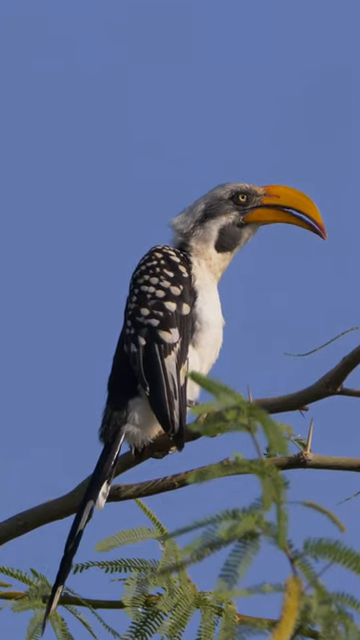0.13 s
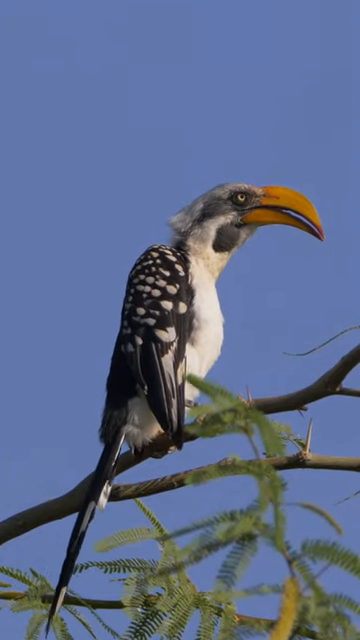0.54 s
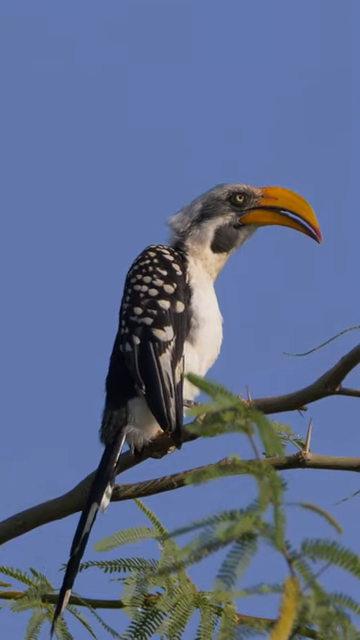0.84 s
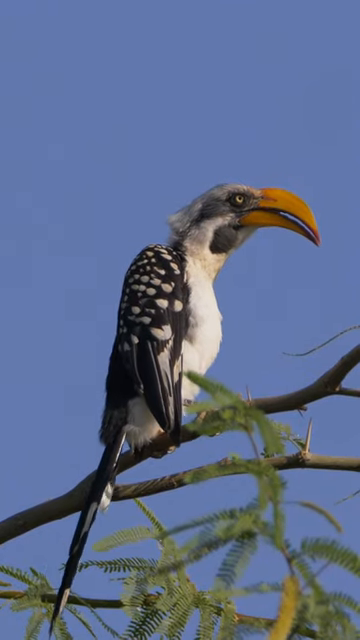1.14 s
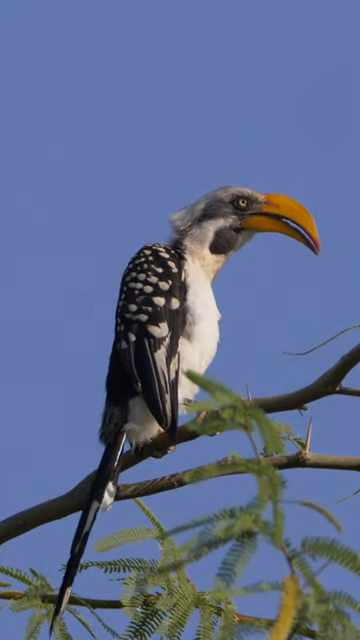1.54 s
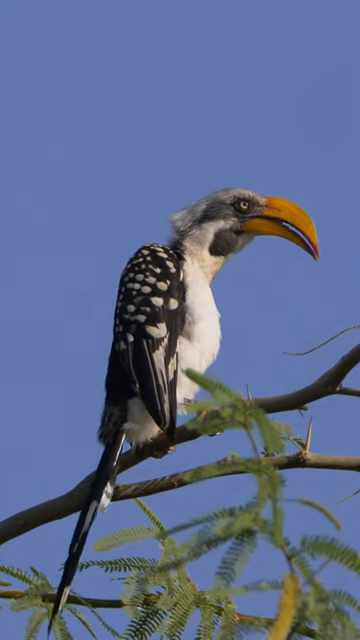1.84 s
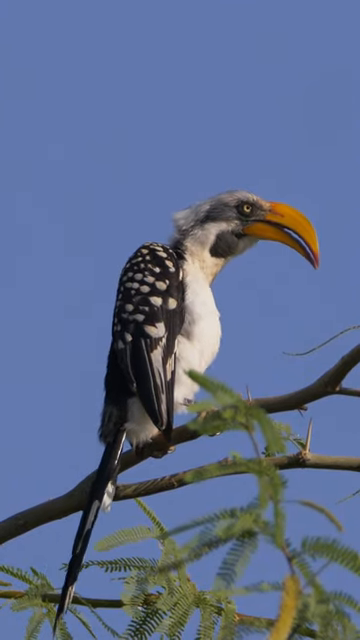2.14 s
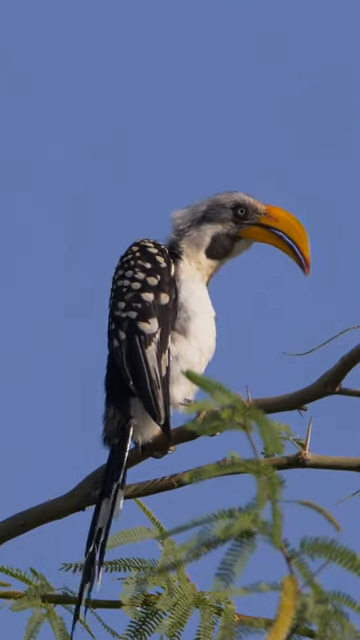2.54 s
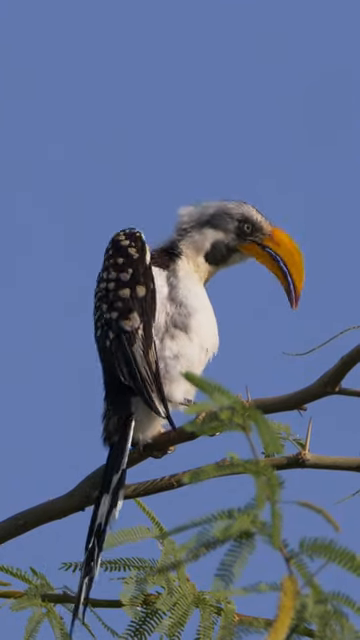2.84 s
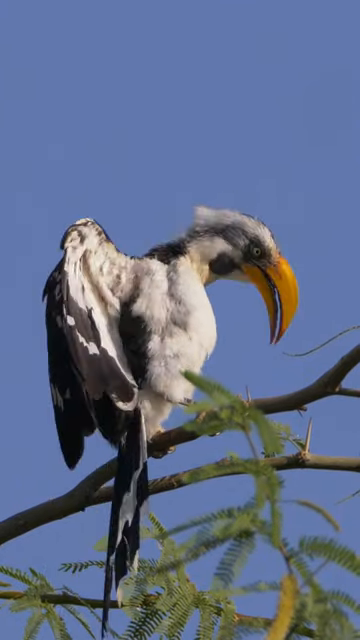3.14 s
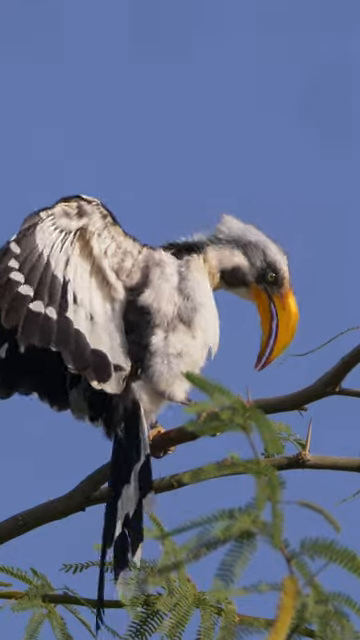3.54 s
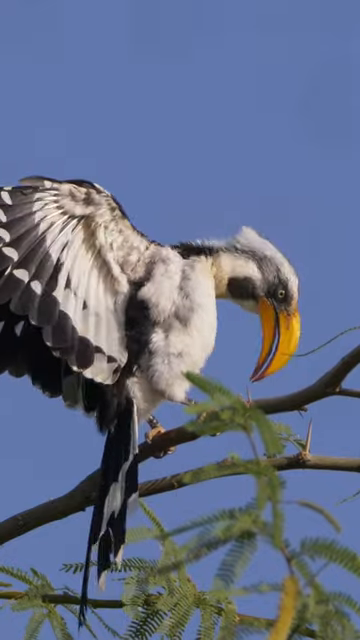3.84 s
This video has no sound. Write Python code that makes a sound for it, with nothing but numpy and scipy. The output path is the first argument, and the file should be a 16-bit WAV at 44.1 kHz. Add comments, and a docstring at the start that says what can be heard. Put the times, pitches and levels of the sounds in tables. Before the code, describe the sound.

A hornbill gives hoarse, hollow clucks about six a second, close and central; a lower, clearer mate fades in and the pair grow louder and higher, over faint songbird chirps outdoors.

```python
"""A hornbill clucks from a tree top, bright and hoarse; its lower, clearer mate joins in and both grow excited.
Each cluck is a stack of overtones with an arching pitch, shaped by the bird's throat.
Below lie a low outdoor rumble and a soft hiss, both made of filtered noise.
Small songbirds whistle and chirp further off as gliding sines, smeared by echoes from the bush."""
import sys
import numpy as np
from scipy import signal
from scipy.fft import rfft, irfft
from scipy.io import wavfile
from scipy.ndimage import uniform_filter1d

SR = 44100
rng = np.random.default_rng(int(sys.argv[2]) if len(sys.argv) > 2 else 0)


def inscribe(sig):
    """Save sig as 16-bit PCM at rate SR to the path in sys.argv[1].

    A 1-D sig is mono; a 2-D sig holds one channel per row.
    Samples are clipped to [-1, 1] before scaling.
    """
    pcm = np.round(np.clip(np.atleast_2d(sig).T, -1, 1) * 32767)
    wavfile.write(sys.argv[1], SR, pcm.astype(np.int16))


def gain_from_db(level_db):
    """Convert decibel levels to linear amplitude factors (20 dB per decade)."""
    decades = np.asarray(level_db, float) / 20
    return 10 ** decades


N = 176400  # samples: 4 s
FLUTTER_DB = 3.0  # far notes waver in level on their way through the leaves


def at_hz(points, hz):
    """Read a table of frequencies and levels, evenly in pitch between its rows."""
    table_hz, table_db = np.transpose(points)
    return np.interp(np.log(np.maximum(hz, 1)), np.log(table_hz), table_db)


def colour(x, points):
    """Filter a sound: make each frequency louder or softer by a table in dB."""
    gain = gain_from_db(at_hz(points, np.fft.rfftfreq(len(x), 1 / SR)))
    return irfft(rfft(x) * gain, len(x))


def rms_one(x):
    """Scale a sound to an average (rms) level of one."""
    return x / np.sqrt(np.mean(x ** 2))


def add(track, s, sound):
    """Mix a sound into the track at s seconds, cutting off what falls outside."""
    i = int(round(s * SR))
    a, b = max(i, 0), min(i + len(sound), N)
    track[a:b] += sound[a - i:b - i]


def tone(hz, gain):
    """A sine that follows a pitch and a level (rms), with soft 2.9 ms ends."""
    edge = np.minimum(np.arange(len(hz)), np.arange(len(hz))[::-1]) / (0.0029 * SR)
    phase = 2 * np.pi * np.cumsum(hz) / SR
    return np.sqrt(2) * gain * np.minimum(edge, 1) * np.sin(phase)


def gusts(depth_db, per_s):
    """A gain that wanders between random levels, per_s of them each second."""
    steps = rng.standard_normal(N // 100)
    return gain_from_db(depth_db * np.interp(np.arange(N) / SR * per_s, np.arange(len(steps)), steps))


# How excitement grows: (time [s], bright cluck length [s], bright top pitch [Hz], mate's top pitch [Hz])
EXCITEMENT_OVER_TIME = [(0, 0.057, 271, 211), (2.577, 0.057, 304.5, 214.2), (3.418, 0.077, 332.9, 234.9)]


def excitement(s):
    """Growing effort: bright cluck length, bright top pitch and mate's top pitch at s seconds."""
    t, *columns = np.transpose(EXCITEMENT_OVER_TIME)
    return [np.interp(s, t, column) for column in columns]


PEAK_AT, SWELL = 0.3704, 1.095  # where in a cluck the effort peaks (0-1); how pointed the swell is
RISE, FALL = .27, .17  # share of the top pitch by which a cluck starts and ends lower
JITTER = 0.11  # scatter of pulse timing at roughness 1 [cycles]
OPENING_DB = 3  # the bill opens: gain per overtone number (up to 7) from start to end of a cluck


def clucks(rows, throat):
    """Syrinx (voice organ) overtones arch in pitch with effort, waver hoarsely and pass the throat."""
    out = np.zeros(N)
    chance = rng.standard_normal((len(rows), 15, 3, 64))
    knots = np.arange(64)  # one random value per cycle of the voice
    for (s, length, db, top_hz, rough), draws in zip(rows, chance):
        u = np.arange(int(length * SR)) / (length * SR)  # 0 to 1 through the cluck
        effort = np.interp(u, [0, PEAK_AT, 1], [0, .5, 1])  # 0.5 at the peak
        drop = np.where(effort < .5, RISE, FALL) * (2 * effort - 1) ** 2
        cycles = np.cumsum(top_hz * (1 - drop)) / SR
        cycles = cycles + JITTER * rough * np.interp(cycles, knots, draws[0, 0])
        hoarse = rough * (1 + 2 * u ** 3)  # each cluck grows hoarser towards its end
        voice = 0
        for k in range(1, 15):
            size = hoarse * np.interp(cycles, knots, draws[k, 0])
            shift = hoarse * np.interp(cycles, knots, draws[k, 1])
            opening = gain_from_db(OPENING_DB * min(k, 7) * (u - 1.0))
            phase = 2 * np.pi * k * cycles + shift * k / 4 + draws[k, 2, 0]
            voice = voice + opening * (1 + size) * np.cos(phase)
        swell = np.sin(np.pi * effort) ** SWELL
        add(out, s, gain_from_db(db) * rms_one(colour(voice, throat)) * swell)
    return out


# Clucks of the bright bird, level before the swell: (time [s], level [dB])
BRIGHT_CLUCKS = [(-.04, -24.5), (.114, -19.5), (0.281, -18), (.444, -20.5), (0.608, -21), (.769, -19),
                 (.928, -18.5), (1.094, -18.5), (1.252, -19), (1.417, -18.5), (1.573, -15.5),
                 (1.738, -16.5), (1.902, -17), (2.063, -17), (2.219, -16.5), (2.386, -17.5), (2.553, -15),
                 (2.715, -15.5), (2.891, -16), (3.062, -14.5), (3.242, -15.5), (3.418, -17), (3.61, -15),
                 (3.79, -15), (3.978, -16)]
# Colour of its throat: (frequency [Hz], level [dB])
BRIGHT_THROAT_COLOUR = [(300, -36), (450, -20), (600, -8.5), (850, 0), (990, -5.5), (1150, 4.5), (1400, -4),
                        (1650, -15.5), (1950, -34), (2700, -27), (4000, -53)]


def bright_hornbill():
    """The bright bird's clucks lengthen, rise in pitch and clear from hoarse to smoother."""
    rows = []
    for s, db in BRIGHT_CLUCKS:
        length, top_hz, _ = excitement(s)
        first_s, last_s = EXCITEMENT_OVER_TIME[0][0], EXCITEMENT_OVER_TIME[2][0]
        rough = np.interp(s, [first_s, last_s], [.7, .24])
        rows.append((s, length, db, top_hz, rough))
    return clucks(rows, BRIGHT_THROAT_COLOUR)


# Clucks of the low mate, level before the swell: (time [s], length [s], level [dB])
MATE_CLUCKS = [(0.072, .035, -36.5), (0.389, 0.027, -43), (0.722, 0.037, -39.5), (0.996, 0.032, -35.5),
               (1.204, 0.026, -32), (1.385, 0.049, -28.5), (1.574, 0.037, -27.5), (1.753, 0.054, -27.5),
               (1.939, 0.059, -25), (2.138, 0.048, -24), (2.323, 0.066, -21), (2.521, 0.043, -18),
               (2.72, 0.0617, -15.5), (2.927, 0.069, -18), (3.132, 0.088, -19), (3.357, 0.072, -19),
               (3.583, 0.09, -17), (3.807, 0.11, -19.5)]
# Colour of its throat: (frequency [Hz], level [dB])
MATE_THROAT_COLOUR = [(250, -31), (430, -15), (660, 5.5), (880, 9.5), (1150, -14.5), (1400, -11),
                      (1750, -12.5), (2400, -51)]
TICK_HZ, TICK_S, TICK_DB = 1733, 0.015, -21  # tick level is against the cluck


def low_hornbill():
    """The mate's clear clucks rise in pitch, each starting with a short high tick."""
    rough = .17
    rows = [(s, length, db, excitement(s)[2], rough) for s, length, db in MATE_CLUCKS]
    out = clucks(rows, MATE_THROAT_COLOUR)
    tick = np.hanning(int(TICK_S * SR))
    for s, _, db in MATE_CLUCKS:
        add(out, s, tone(np.full(len(tick), TICK_HZ), gain_from_db(db + TICK_DB) * tick))
    return out


def echoes(x, t60, build_s):
    """Scatter from leaves and branches: a lumpy tail of unit energy, dying by 60 dB in t60 seconds."""
    t = np.arange(SR // 2) / SR
    tail = rng.standard_normal(len(t)) * gain_from_db(-60 * t / t60)
    tail = tail * (1 - np.exp(-t / build_s)) * gusts(FLUTTER_DB, per_s=60.9)[:len(t)]
    return signal.fftconvolve(x, tail / np.sqrt(np.sum(tail ** 2)))[:N]


# Low rumble before gusting; it swells again as the wings spread: (time [s], level [dB])
RUMBLE_LEVEL = [(0, -49), (1.9, -60), (2.6, -63.5), (3.099, -55.5), (3.5, -59.5)]


def rumble():
    """Lumpy low noise between 50 and 270 Hz, gusting."""
    s, db = np.transpose(RUMBLE_LEVEL)
    band = signal.butter(3, [50, 270], "band", fs=SR, output="sos")
    noise = rms_one(signal.sosfilt(band, rng.standard_normal(N)))
    level = gain_from_db(np.interp(np.arange(N) / SR, s, db))
    return noise * level * gusts(4.5, per_s=14)


# Colour of the hiss, only its shape counts: (frequency [Hz], relative level [dB per Hz])
HISS_COLOUR = [(40, -30), (330, -27.5), (1200, -31.5), (2800, -25.5), (6000, -31), (15700, -35.5)]
# Colour of the side (left-right difference) against the middle: (frequency [Hz], level [dB])
HISS_SIDE_COLOUR = [(25, -36.5), (300, -2), (2500, -5.5), (6000, -1.5)]


def hiss():
    """Steady coloured noise for the middle and, coloured once more, for the side."""
    mid, side = [colour(row, HISS_COLOUR) for row in rng.standard_normal((2, N))]
    gain = gain_from_db(-58) / np.std(mid)
    return gain * mid, gain * colour(side, HISS_SIDE_COLOUR)


CHORUS_PER_S, CHORUS_DB = 50, -64  # notes per second; level of the softest notes
CHORUS_LOW_HZ, CHORUS_HIGH_HZ = 2300, 3997  # range of starting pitches


def chorus():
    """Many small birds far off, twittering at random in short falling notes."""
    out = np.zeros(N)
    u = np.linspace(0, 1, SR // 40)  # each note lasts 25 ms
    for when, start, glide, size in rng.random((int(CHORUS_PER_S * N / SR), 4)):
        start_hz = CHORUS_LOW_HZ + (CHORUS_HIGH_HZ - CHORUS_LOW_HZ) * start ** 2
        hz = start_hz * (1 - 0.406 * glide * u)
        add(out, when * N / SR, tone(hz, gain_from_db(CHORUS_DB + 16.3 * size) * np.sin(np.pi * u)))
    return out


# Longer whistles, a list of points for each: (time [s], pitch [Hz], level [dB])
WHISTLE_CONTOURS = [
    [(.315, 4655, -58), (.4, 3790, -42.5)],
    [(.765, 2450, -53), (.93, 2390, -55)],
    [(1.195, 2142, -69), (1.227, 2736, -41.5), (1.238, 6740, -52.5), (1.252, 7210, -48),
     (1.278, 4950, -48.5)],
    [(2.32, 2550, -49.5), (2.5, 2210, -66)],
    [(2.35, 4250, -46.5), (2.41, 3800, -38.5), (2.49, 2886, -42.5)],
    [(2.615, 2800, -44.5), (2.655, 3710, -28), (2.69, 3907, -39.5), (2.74, 4030, -34.5)],
    [(2.74, 3810, -27), (2.76, 3086, -32), (2.8, 2733, -43), (2.855, 3293, -38)],
    [(2.7, 2400, -56.5), (2.96, 2090, -59.5)],
    [(3.387, 5200, -40), (3.455, 2900, -37)],
]
# One reedy arched call, by its unheard base pitch: (time [s], pitch [Hz], level [dB])
ARCHED_CALL = [(.99, 1060, -60), (1.028, 1780, -50), (1.08, 1150, -64)]


def whistlers():
    """Sines follow drawn contours; the arched call sounds at two and three times its base pitch."""
    out = np.zeros(N)
    for rows, multiple in [(rows, 1) for rows in WHISTLE_CONTOURS] + [(ARCHED_CALL, 2), (ARCHED_CALL, 3)]:
        s, hz, db = np.transpose(rows)
        t = np.arange(s[0], s[-1], 1 / SR)
        smooth_hz = uniform_filter1d(np.interp(t, s, hz), size=400)  # rounds the corners of the glide
        add(out, s[0], tone(multiple * smooth_hz, gain_from_db(np.interp(t, s, db))))
    return out


# Quick chirps, level at the loudest point: (time [s], length [s], from [Hz], to [Hz], level [dB])
CHIRP_SWEEPS = [(0.479, 0.0076, 5400, 2590, -38), (0.512, 0.029, 5780, 7210, -45),
                (0.537, 0.02, 5460, 2570, -36), (0.543, 0.058, 7600, 2640, -38.5),
                (1.206, .024, 4300, 5250, -49), (1.284, 0.053, 7100, 4200, -45.5),
                (1.357, 0.022, 3910, 2590, -42.5), (1.421, 0.026, 3050, 3700, -51),
                (1.547, 0.075, 3260, 1950, -40), (1.724, 0.019, 3060, 5180, -61),
                (1.781, 0.021, 5620, 2350, -37), (1.873, .024, 5910, 2800, -39.5),
                (2.046, 0.019, 3710, 2960, -43.5), (2.504, 0.055, 3103, 1660, -45.5),
                (2.528, 0.041, 4100, 2800, -33.5), (2.876, 0.041, 6070, 4240, -36),
                (3.141, 0.0306, 5450, 4340, -48.5), (3.368, 0.033, 5510, 2845, -30),
                (3.397, .032, 4800, 3350, -35)]


def chirpers():
    """Sines sweep from one pitch to another, fast at first and then flattening."""
    out = np.zeros(N)
    for s, length, from_hz, to_hz, db in CHIRP_SWEEPS:
        u = np.arange(int(length * SR)) / (length * SR)
        hz = to_hz + (from_hz - to_hz) * (1 - u) ** 2.4
        add(out, s, tone(hz, gain_from_db(db) * np.sin(np.pi * u ** 0.92)))
    return out


FAR_T60_S, FAR_BUILD_S = 0.53, 0.0044  # how long the far echo takes to die by 60 dB; how fast it builds up


def scene():
    """Birds in the centre, echoes and hiss wider; the far chorus arrives only as echo."""
    pair = bright_hornbill() + low_hornbill()
    near_echo = gain_from_db(-15.5) * echoes(pair, 0.11, 0.003)
    hiss_mid, hiss_side = hiss()
    whistles, chirps = whistlers(), chirpers()
    # The whistlers are hidden in the bush: less direct sound
    song = chirps + gain_from_db(-4) * whistles * gusts(FLUTTER_DB, per_s=90)
    # The chirpers sit nearer than the whistlers: less echo
    far = gain_from_db(-4) * chirps + whistles + chorus()
    far_echo = gain_from_db(0.5) * echoes(far, FAR_T60_S, FAR_BUILD_S)
    side_echo = gain_from_db(-24) * echoes(far + gain_from_db(-26.5) * pair, FAR_T60_S, FAR_BUILD_S)
    mid = pair + near_echo + song + far_echo + hiss_mid + rumble()
    side = side_echo + hiss_side + gain_from_db(-18.0) * rumble()
    return np.array([mid + side, mid - side])


def roll_off(x):
    """The treble ends steeply here."""
    return signal.sosfilt(signal.butter(12, 15880, fs=SR, output="sos"), x)


def record(dry):
    """A short 2 ms fade at both ends finishes the mix."""
    edge = np.minimum(np.arange(N), np.arange(N)[::-1]) / (.002 * SR)
    mix = dry * np.minimum(edge, 1)
    return roll_off(mix)


dry = scene()
out = record(dry)
inscribe(out)
```